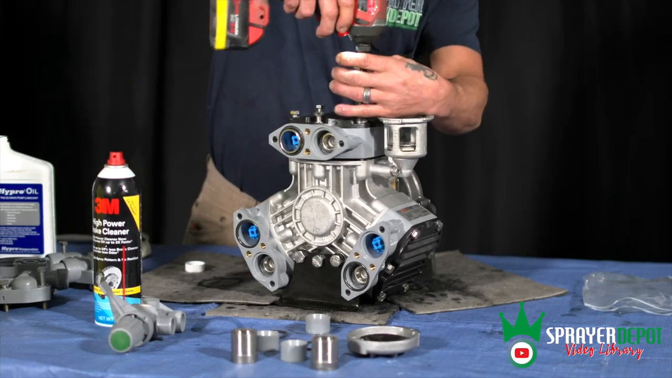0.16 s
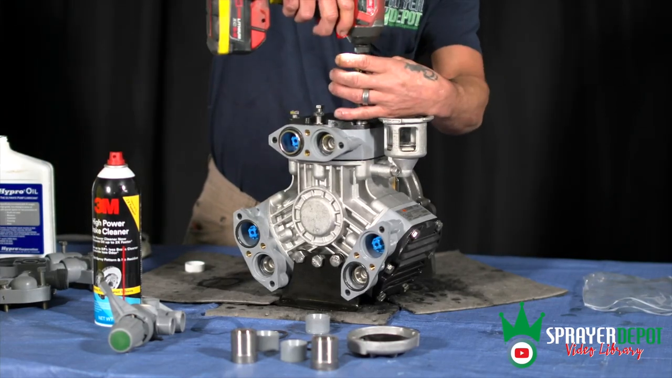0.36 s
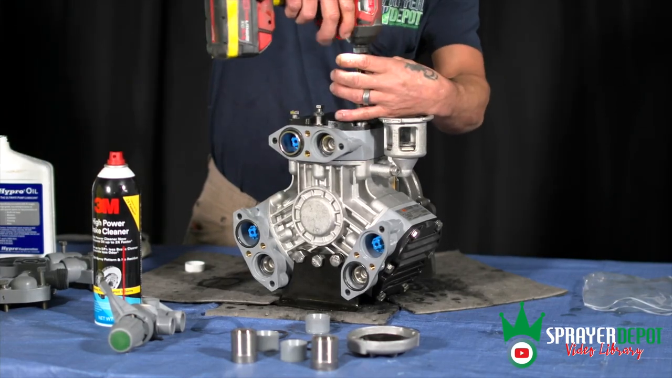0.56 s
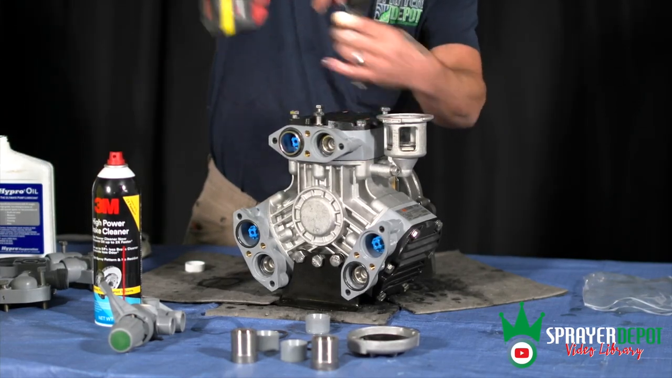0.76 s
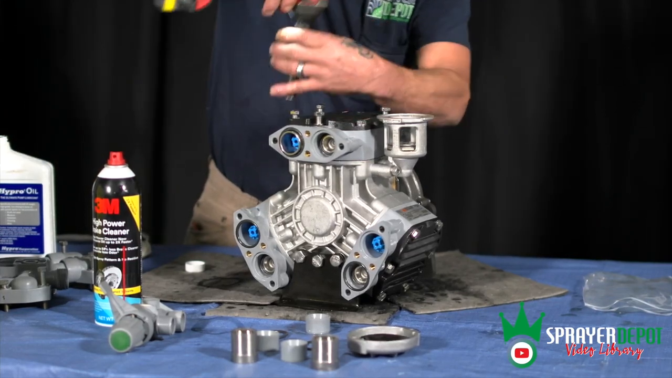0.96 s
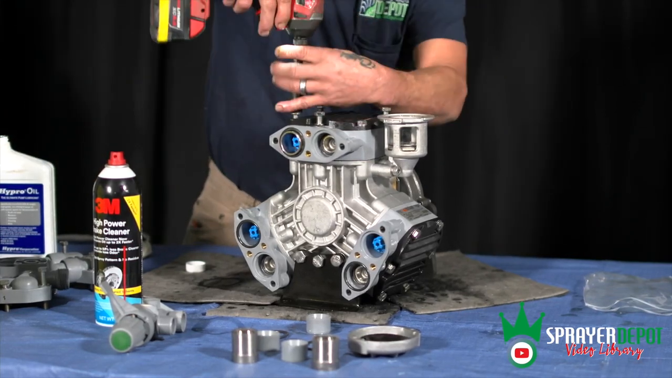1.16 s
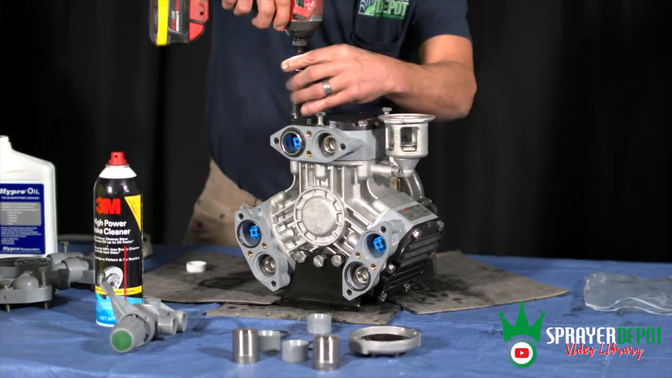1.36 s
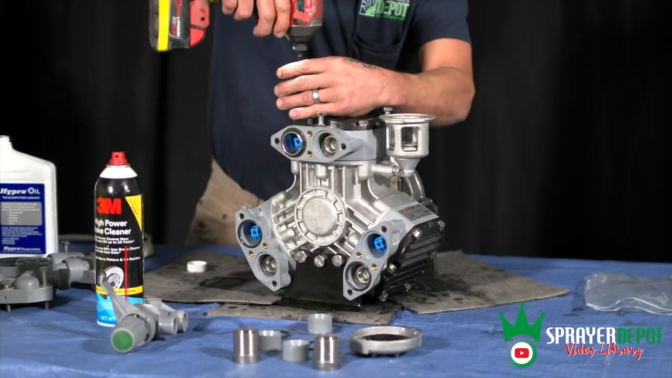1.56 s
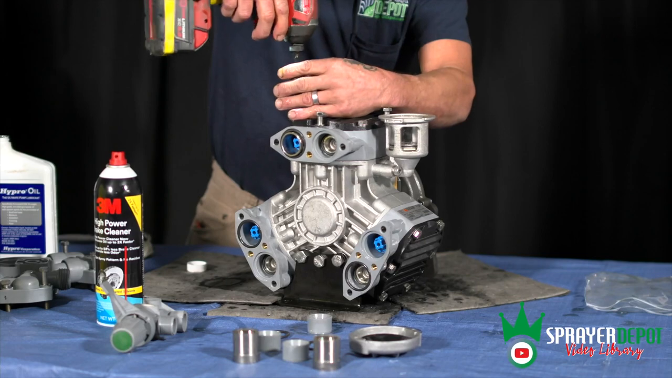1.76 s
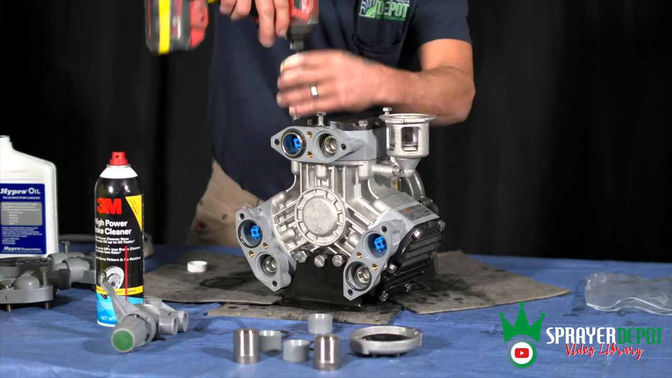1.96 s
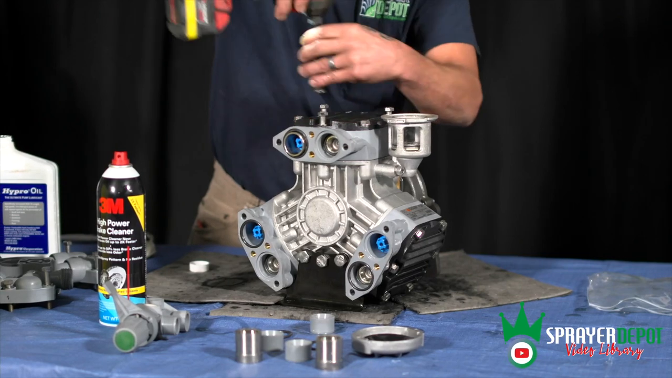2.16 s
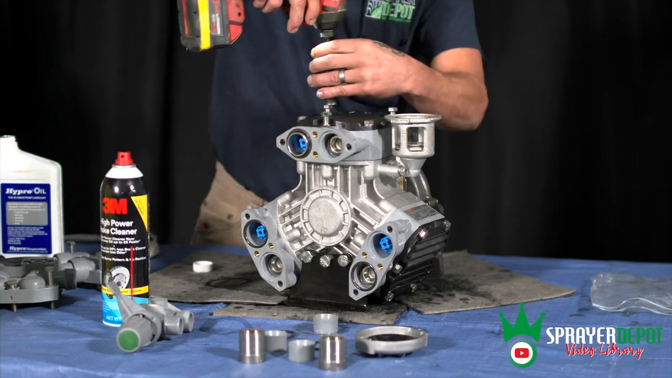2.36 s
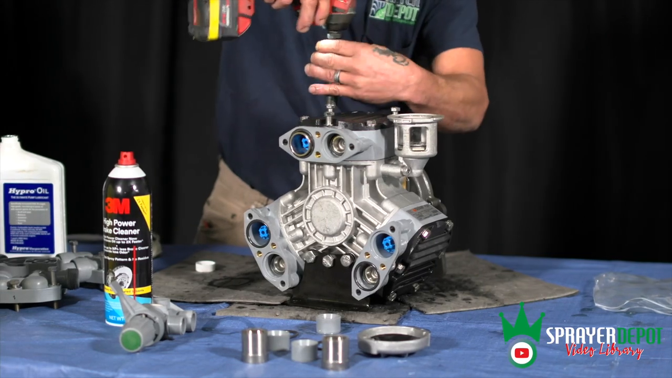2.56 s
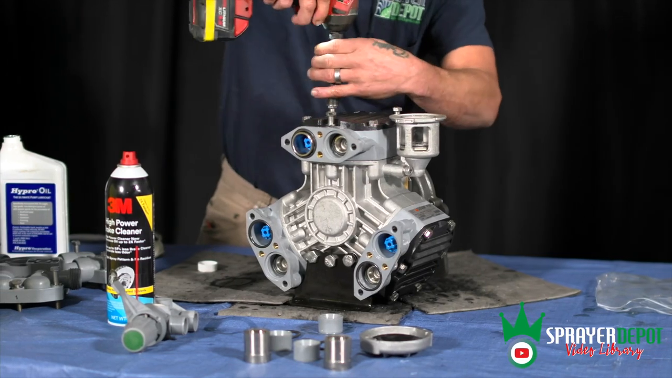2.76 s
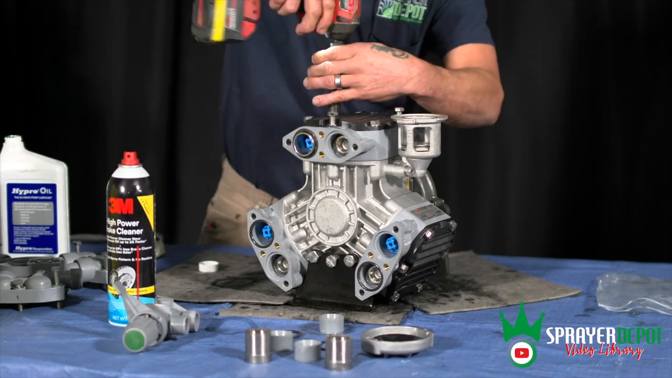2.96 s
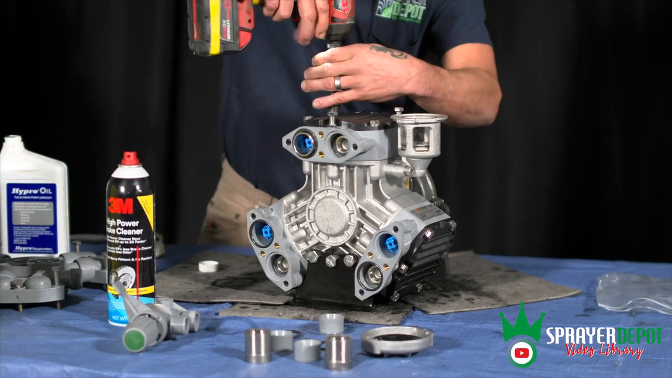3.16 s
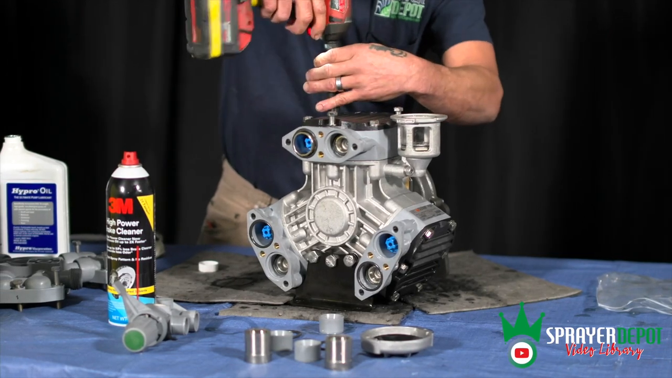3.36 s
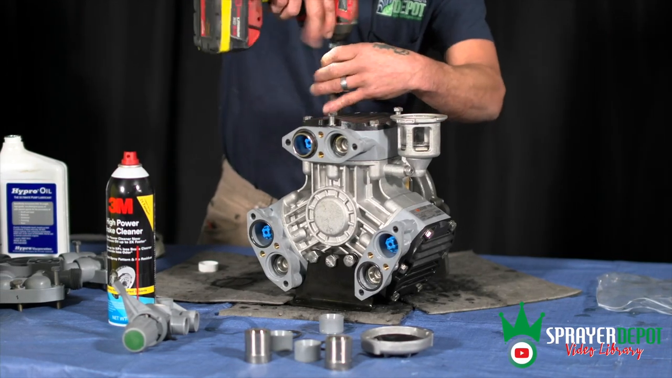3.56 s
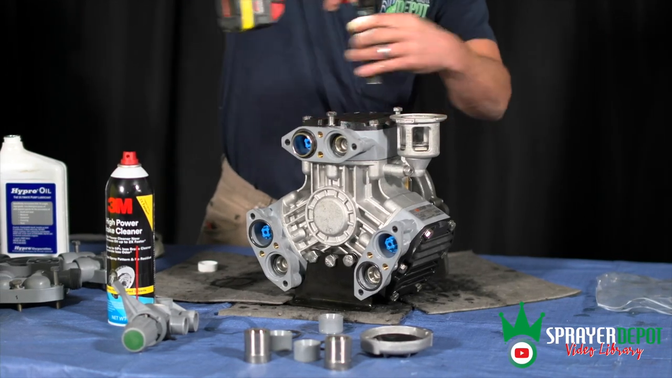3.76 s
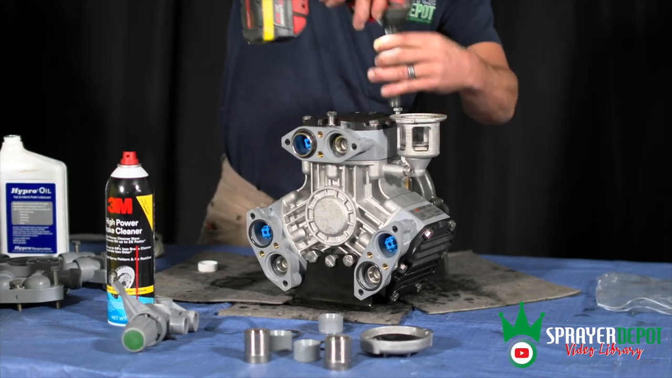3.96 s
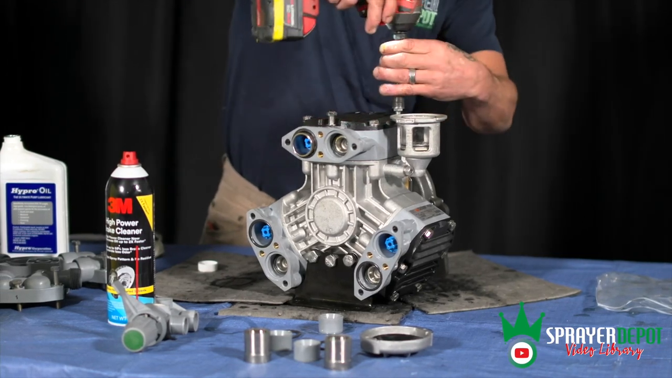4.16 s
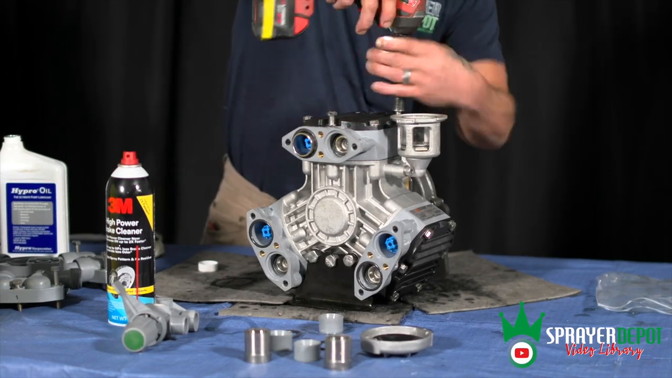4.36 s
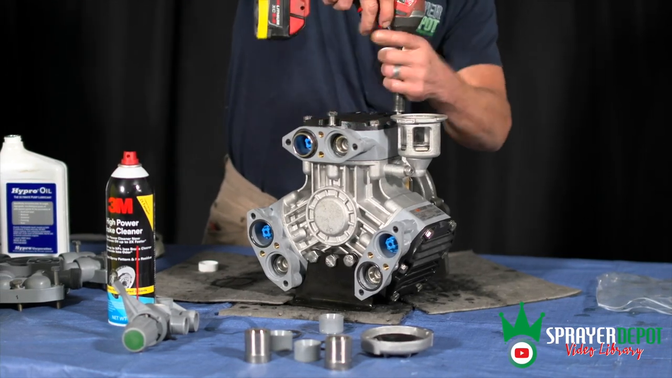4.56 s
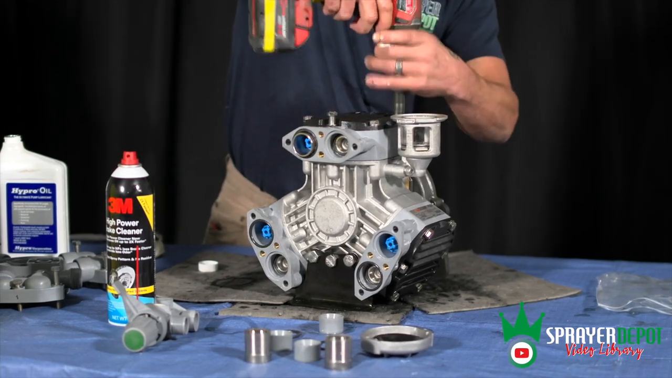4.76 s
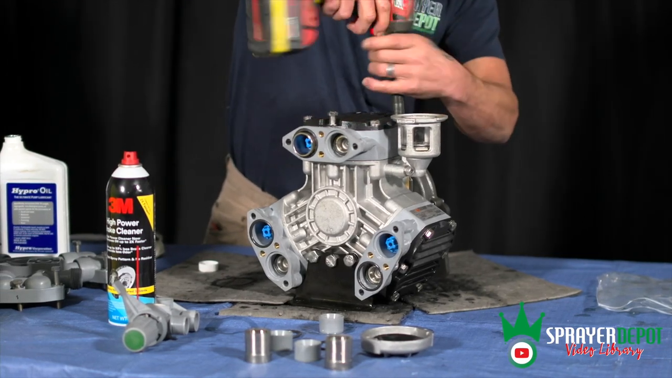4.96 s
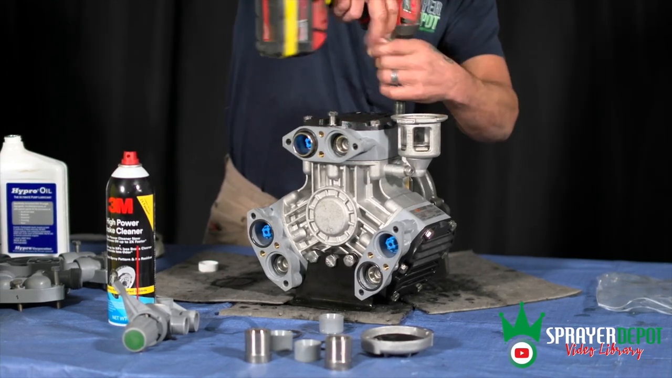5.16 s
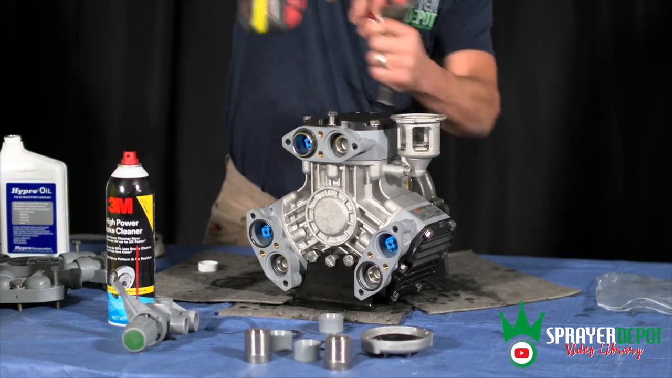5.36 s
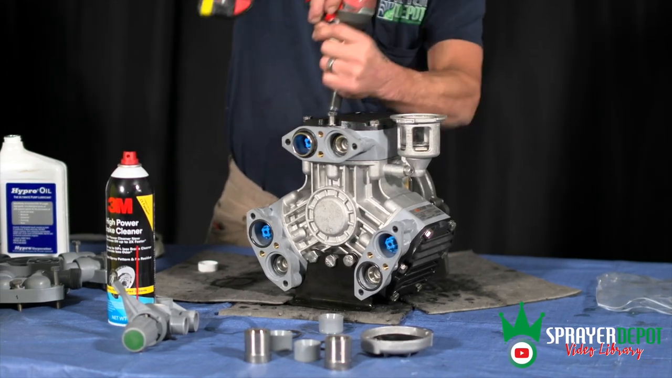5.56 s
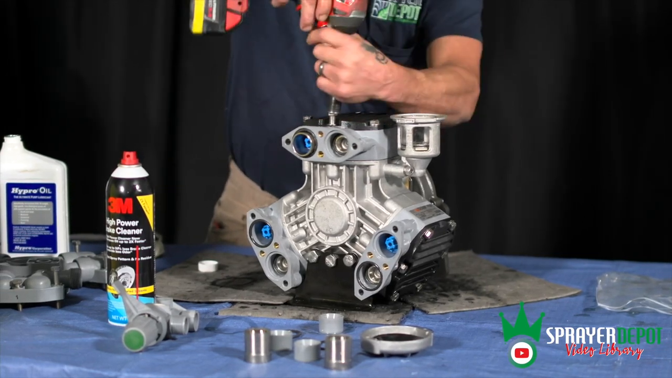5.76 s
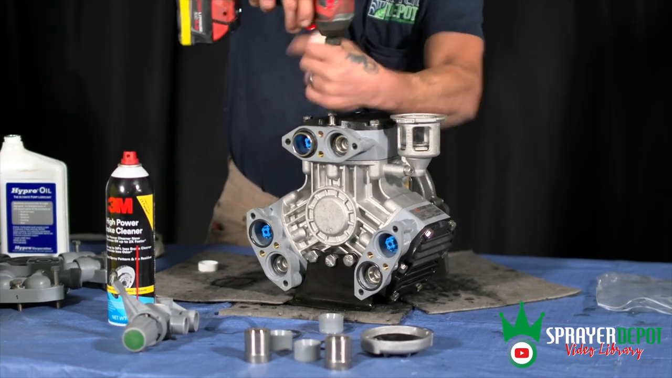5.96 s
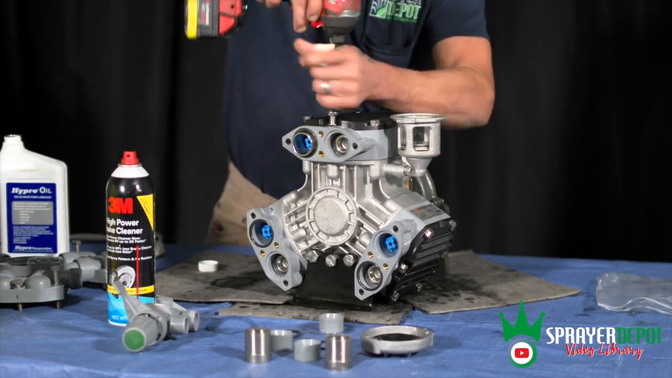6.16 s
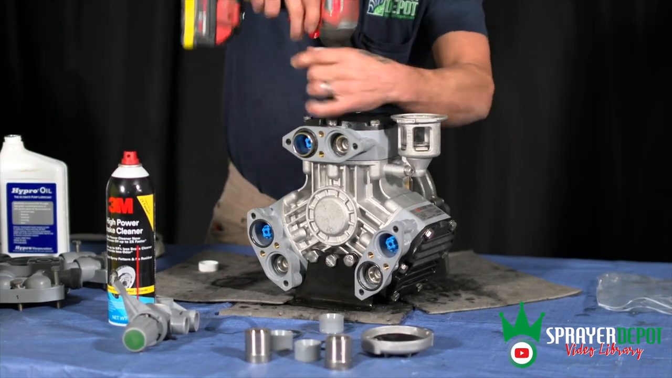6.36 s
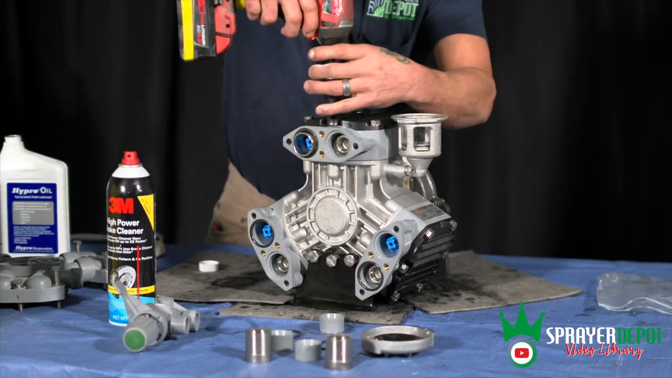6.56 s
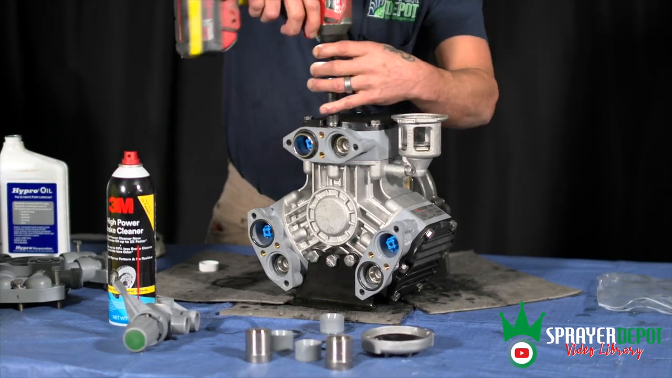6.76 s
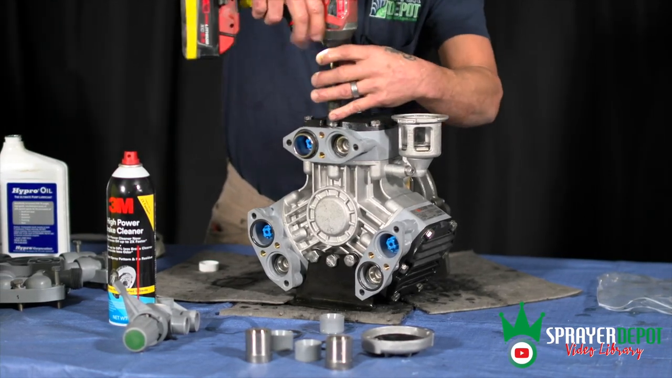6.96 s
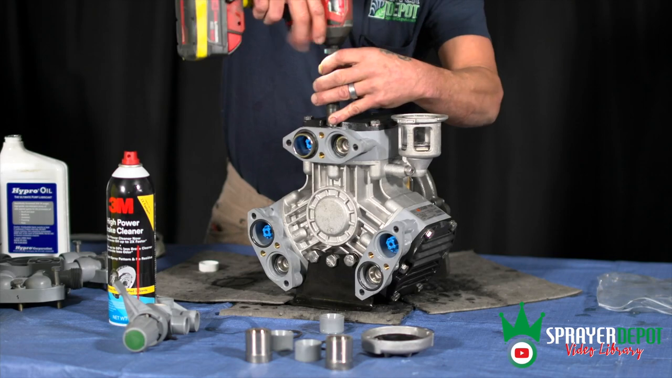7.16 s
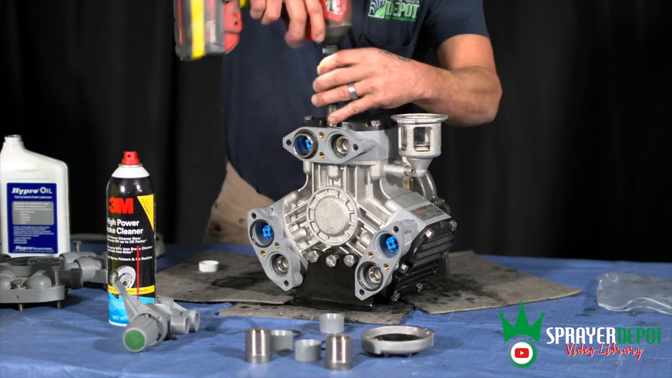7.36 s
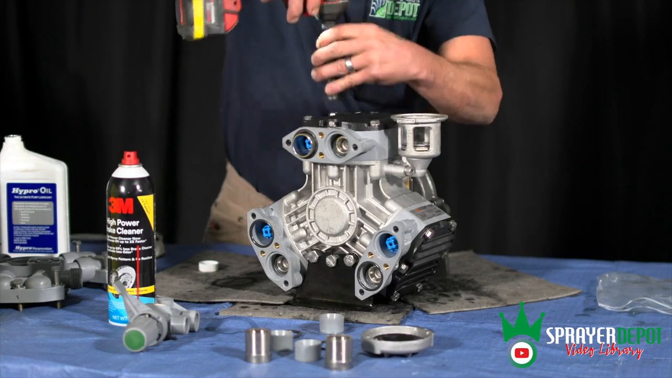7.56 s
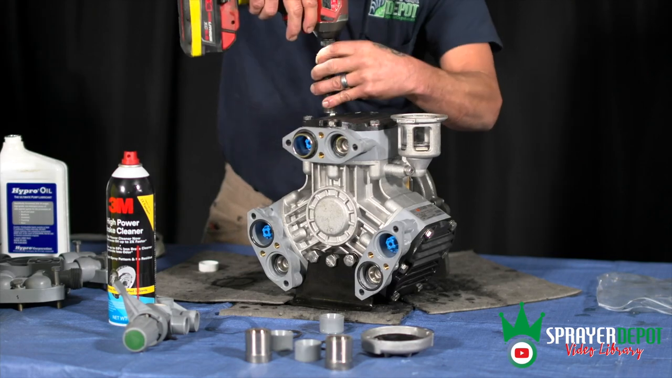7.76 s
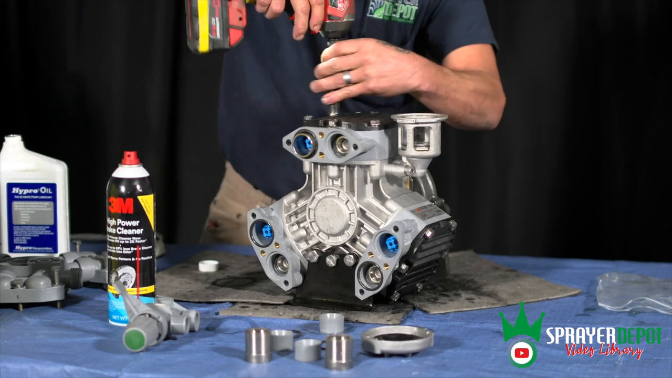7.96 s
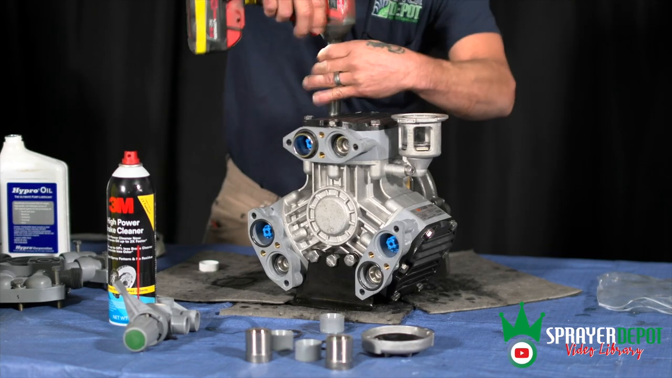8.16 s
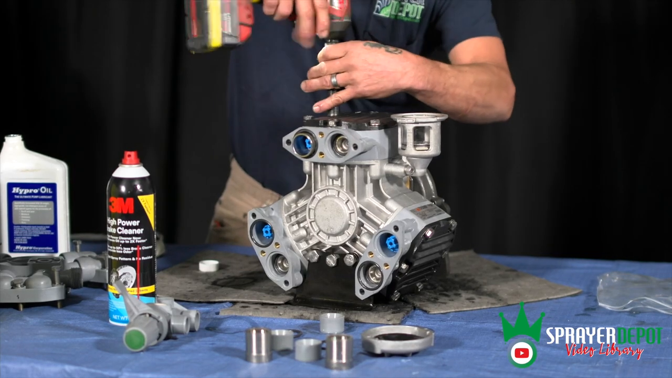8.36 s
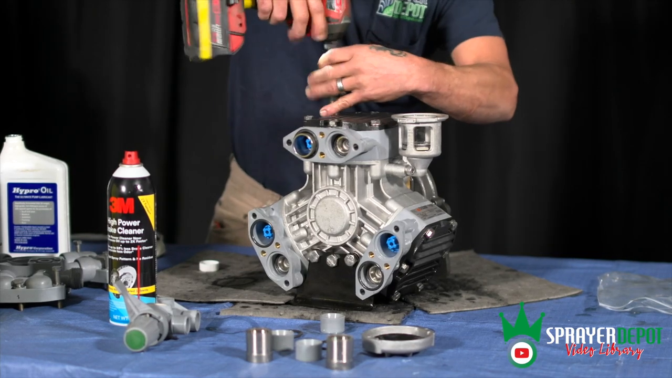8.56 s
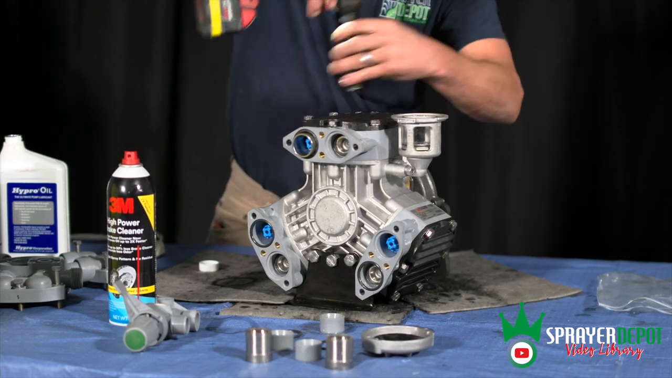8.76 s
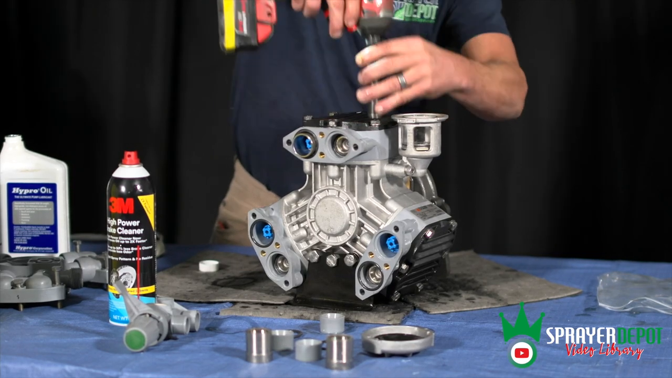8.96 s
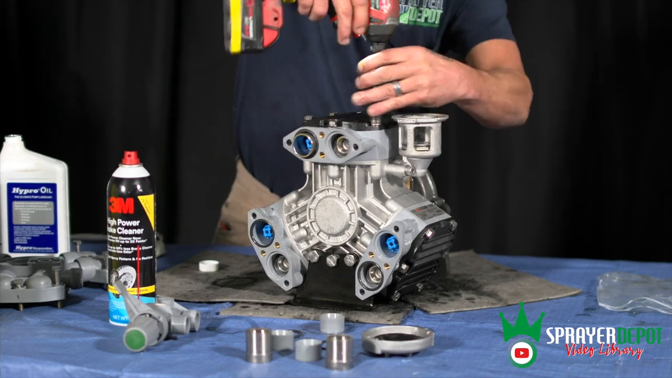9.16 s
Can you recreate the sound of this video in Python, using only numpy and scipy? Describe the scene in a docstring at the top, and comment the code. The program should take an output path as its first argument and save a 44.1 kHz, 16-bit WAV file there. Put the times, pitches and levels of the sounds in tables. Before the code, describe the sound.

A cordless impact driver tightens bolts on a metal pump in a slightly echoing workshop. It starts with brief, fairly quiet whirs of motor and gears and a couple of sharp cracks. Then the pulls end in loud, rapid hammering bursts, which come closer together near the end. Between pulls the steel socket clinks and snaps onto bolt heads. The tool sounds near, over faint ventilation.

```python
"""Impact driver on a pump head.

A cordless driver runs bolts into a casting in a reverberant, ventilated workshop. On each pull the
trigger whistles, motor and gears spin up and the thread rubs. On most pulls the hammer then strikes
the anvil, up to about 70 times a second. Between bolts the socket clinks on the bolt heads."""
import sys
import numpy as np
from scipy import signal
from scipy.fft import rfft, irfft, next_fast_len
from scipy.io import wavfile

SR = 44100
rng = np.random.default_rng(int(sys.argv[2]) if len(sys.argv) > 2 else 0)


def dump_mix(stems):
    """Bounce the given channels to the path in sys.argv[1] as a 16-bit WAV at rate SR."""
    frames = np.atleast_2d(stems).T  # one column per channel
    limited = np.clip(frames, -1, 1)  # hard clip at full scale
    pcm = np.round(limited * 32767).astype(np.int16)
    wavfile.write(sys.argv[1], SR, pcm)


N = 407043
TIME_S = np.arange(N) / SR

# ventilation air noise: f/Hz, level/dB
AIR_SPECTRUM = [(15, -69.5), (25, -40), (87, -16.5), (108, -10), (123, -22.5), (206, -12.5), (242, -10),
                (373, -14.5), (624, -12), (988, -18.5), (1190, -23), (1440, -18.5), (2160, -26),
                (2350, -24), (7000, -40), (16000, -48.5)]
# fan tones: f/Hz, level/dB
FAN_TONES = [(60, -76.5), (94.8, -69), (243, -66.5), (292, -71), (551, -71.5)]
# workshop decay: f/Hz, t60/s
ROOM_DECAY = [(150, 0.38), (700, 0.77), (2000, 0.59), (4000, 0.56), (8000, 0.47), (14000, 0.49)]

# steel socket and bolt: f/Hz, level/dB, t60/s
STEEL_MODES = [(1518, -4, .28), (3450, -12, .35), (3747, -8, .37), (3844, -5, .14), (4750, -15, .45),
               (5048, -14, .52), (6422, -20, .32), (7154, -14, .45), (8960, -17, .42), (9120, -21, .3)]
# tick of a knock: f/Hz, level/dB
KNOCK_SPECTRUM = [(80, -28), (230, 3), (420, -9), (750, 3), (1500, 3), (2300, 5), (3700, 6), (5500, -4),
                  (8300, -4.5), (10500, -21.5), (16000, -30.5)]
# loose socket on bolt heads: t/s, level/dB, thud/dB, edge/dB, ringing/dB, favoured f/Hz
BOLT_KNOCKS = [ (.438, -32, -4.5, 14, -17, 1520), (1.1302, -21.5, 0, -2, -3.5, 4900),
               (2.2949, -15.5, 11.5, 6, -23, 3420), (4.029, -22.5, 8.5, 9, -12.5, 7150),
               (4.354, -26.5, 9.5, 0, -18, 1520), (4.369, -31.5, 19, 0, -18.5, 1520),
               (4.45, -36.5, -1, 1, -13.5, 8980), (5.638, -36, -13, 0, -15, 3800),
               (5.657, -32.5, 8.5, 0, -13, 3800), (5.937, -31.5, 9, 7, -15.5, 1520),
               (6.223, -34.5, 8, -5, -23, 1520), (6.41, -15, 7.5, 2, -29, 1520),
               (6.414, -14.5, 10, -16, -30, 1540), (7.799, -20.5, 3, -7, -6, 4100),
               (7.935, -25, 3, -4.5, -9, 4900), (8.216, -12, 4, 0, -12, 3800),
               (9.045, -23.5, 9, 10.5, -9.5, 9100), (9.224, -18.5, -9, 8.5, -9, 9200)]
# tool clicks at start: t/s, level/dB
TOOL_CLICKS = [(1.681, -21), (2.8406, -24.5), (4.706, -21), (6.499, -18.5), (7.093, -25), (8.28, -27)]
# contacts inside the tool: thud/dB, edge/dB, ringing/dB, favoured f/Hz
CLICK_CONTACT = (-10, 7, -21, 9001)
TAKE_UP_CONTACT = (-2.5, -1, -29, 3803.5)
RATTLE_CONTACT = (0, 7, -27, 7147)
# socket drops home: t/s, level/dB
SEATINGS = [(2.296, -20.5), (7.799, -20), (8.219, -9.5)]
# its snap: f/Hz, width/Hz, level/dB
SEATING_MODES = [(2950, 970, -22), (3560, 720, 31), (4500, 290, -31)]

# trigger pulls: t/s, held/s, top mesh f/Hz, gears/dB, thread/dB, take-up knock/dB
PULLS = [ (-.012, .098, 5900, -22, -27.5, -22.5), (.278, .145, 5501, -29, -27, -37),
         (1.367, .112, 6000, -23.5, -36, -21), (1.68, .085, 6200, -24, -22, -23.5),
         (2.83, .103, 6200, -24.5, -28.5, -17.5), (3.09, .06, 6204, -32, -26.5, -29),
         (3.314, .183, 6256, -25, -19, -32), (4.6969, .335, 6257, -24, -33.5, -16.5),
         (6.497, .35, 6184, -23.5, -37, -10.5), (7.083, 0.12, 6000, -21, -42, -22),
         (7.32, .08, 6010, -24.5, -39, -6), (8.273, .11, 6054, -21, -49, -10.5),
         (8.534, 0.074, 5880, -19, -30, -11)]
# resonances of the rubbing thread: f/Hz, width/Hz, level/dB
RUB_MODES = [(720, 350, -11), (1430, 250, 0), (1720, 280, -7), (3550, 600, -10)]
# gear rattle: f/Hz, level/dB
GEAR_SPECTRUM = [(100, -35), (170, -21.5), (240, -12), (390, -18), (560, -7), (800, -3), (1200, -8),
                 (1500, 1), (2130, -7), (2800, 0.5), (3700, -2.5), (5000, -6), (6500, -9.5), (8200, -9),
                 (10500, -24), (12800, -24.5), (16000, -33.5)]
# gear whine: multiple of mesh rate, level/dB
GEAR_LINES = [(.146, -16), (.222, -15), (.293, -14), (.464, -17), (.585, -4), (1, -4), (2, -22)]
# gear housing: f/Hz, gain/dB
HOUSING_RESPONSE = [(600, -6), (1400, -1), (2200, -5), (2850, 3.5), (3200, 1), (3700, -.5), (4200, -7),
                    (4950, -1.5), (5500, -5.5), (6150, 2), (7000, -5)]

# hammering: t/s, blows, first gap/s, last gap/s, first blow/dB, last blow/dB, slack knock/dB, boom/dB
HAMMER_BURSTS = [ (.505, 2, .0135, .0135, -2, -8, -25.5, -2), (1.7708, 2, .0135, .0135, -4.5, -13, -3, 4),
                 (3.398, 9, .02, .015, -1, 0.5, -17.5, -18),
                 (4.9402, 9, .0158, .017, -2.5, -1.5, -16.5, -9),
                 (6.7418, 8, .017, .025, -2, -2, -22.5, -2), (7.129, 6, .02, .016, 0, -3.5, -8.5, -9),
                 (7.366, 4, .021, .0135, 0, -2.5, -8.5, 5), (8.331, 5, .02, .0175, 1, -4, -5, 2.5),
                 (8.5918, 4, .0135, 0.015, -1, -2.5, -4, 3.5)]
# crack of a blow: f/Hz, level/dB
BLOW_SPECTRUM = [(100, -25), (170, -14), (245, -8.5), (390, -14), (560, -8), (800, -5.5), (1150, -5),
                 (1600, -1.5), (2700, 1), (4900, 0.5), (6300, -7), (8100, -3), (10000, -13.5),
                 (12700, -18.5), (16000, -28)]
# hammer case and pump casting: f/Hz, level/dB, t60/s
BODY_MODES = [(860, -3.5, 0.023), (1510, 8, .04), (1690, -11, .04), (2500, -7, .015), (3680, -1, 0.04),
              (4044, -4.5, 0.033), (4700, 9, .03), (8000, -1.5, .01)]

FULL_MESH_HZ = 6200
SLACK_LEAD_S = .0046


def from_db(db):
    """Decibels to gain."""
    return 10 ** (np.asarray(db) / 20)


def unit_rms(x):
    """Scale to rms 1."""
    return x / np.sqrt(np.mean(x ** 2) + 1e-20)


def at_hz(points, hz):
    """Read a table on a log-frequency axis."""
    known_hz, values = np.transpose(points)
    return np.interp(np.log(hz + 1), np.log(known_hz), values)


def coloured(x, spectrum):
    """Filter x by a spectrum; rms 1."""
    size = next_fast_len(len(x))
    hz = np.fft.rfftfreq(size, 1 / SR)
    return unit_rms(irfft(rfft(x, size) * from_db(at_hz(spectrum, hz)), size)[:len(x)])


def drift(rate_hz):
    """Straight lines between unit Gaussian knots."""
    knots = rng.standard_normal(8192)
    return np.interp(TIME_S * rate_hz, np.arange(len(knots)), knots)


def ring(x, hz, t60_s):
    """One mode: a unit click starts a decaying unit sine."""
    r, w = from_db(-60 / (t60_s * SR)), 2 * np.pi * hz / SR
    return signal.lfilter([0, np.sin(w)], [1, -2 * r * np.cos(w), r * r], x + 1e-18)


def resonance(x, hz, width_hz):
    """Band-pass, peak gain 1."""
    r, w = np.exp(-np.pi * width_hz / SR), 2 * np.pi * hz / SR
    return signal.lfilter(np.array([1, 0, -1]) * (1 - r * r) / 2, [1, -2 * r * np.cos(w), r * r], x)


def smeared_click(envelope):
    """Flat-spectrum click spread over an envelope."""
    noise = rng.standard_normal(len(envelope)) * envelope
    phase = np.angle(rfft(noise, 2 * len(noise)))
    return irfft(np.exp(1j * phase))[:len(noise)] * np.sqrt(np.sum(envelope ** 2))


def add(out, start_s, sound):
    """Mix in a sound; negative times start at 0."""
    start = max(round(start_s * SR), 0)
    part = sound[:max(N - start, 0)]
    out[start:start + len(part)] += part


def ventilation(air_db=-55.5):
    """Soft air noise and steady fan tones."""
    tones = sum(np.sqrt(2) * from_db(db) * np.sin(2 * np.pi * hz * TIME_S) for hz, db in FAN_TONES)
    return from_db(air_db) * coloured(rng.standard_normal(N), AIR_SPECTRUM) + tones


def room_tail(build_s=.0011, treble_db=-3.5):
    """1 s of diffuse echoes, longest in the mids; energy 1."""
    t = np.arange(SR) / SR
    white, hz = rfft(rng.standard_normal(SR)), np.fft.rfftfreq(SR, 1 / SR)
    edges_hz = np.geomspace(80, 20000, 13)
    tail = np.zeros(SR)
    for low, high in zip(edges_hz, edges_hz[1:]):
        centre_hz = np.sqrt(low * high)
        band = irfft(white * ((hz >= low) & (hz < high)), SR)
        tilt_db = at_hz([(3000, 0), (12000, treble_db)], centre_hz)
        tail += band * from_db(tilt_db - 60 * t / at_hz(ROOM_DECAY, centre_hz))
    tail *= 1 - np.exp(-t / build_s)
    return tail / np.sqrt(np.sum(tail ** 2))


def workshop(x, bench_s=.0033, bench_db=-7):
    """Direct sound, bench bounce, and echoes that change as tool and arm move."""
    out, tails = x.copy(), [room_tail() for _ in range(13)]
    add(out, bench_s, from_db(bench_db) * x)
    hop = SR // 25
    fade = np.sin(np.pi * np.arange(2 * hop) / (2 * hop))
    for k, start in enumerate(range(0, N, hop)):
        part = x[start:start + 2 * hop]
        add(out, start / SR, signal.fftconvolve(part * fade[:len(part)], tails[k % len(tails)]))
    return out


def knocks(take_up_s=.032, rattle_delays_s=(.043, .054), rattle_db=11):
    """Rows of light contacts: bolt knocks, start clicks, gear take-up, socket rattle on braking."""
    rows = BOLT_KNOCKS + [(s, db, *CLICK_CONTACT) for s, db in TOOL_CLICKS]
    for s, held_s, _, gear_db, _, take_up_db in PULLS:
        rows.append((s + take_up_s, take_up_db, *TAKE_UP_CONTACT))
        rows += [(s + held_s + lag_s, gear_db + rattle_db, *RATTLE_CONTACT) for lag_s in rattle_delays_s]
    return rows


def socket_clinks(tick_db=-9, tick_s=.0033, ring_db=-23, favour_db=7.5, favour_width_hz=350):
    """Each knock ticks; a hard edge rings the high modes, and the spot struck favours one pitch."""
    out, t = np.zeros(N), np.arange(SR // 2) / SR
    force = np.exp(-t / tick_s)
    for s, db, thud_db, edge_db, ringing_db, favoured_hz in knocks():
        contact = [(1000, thud_db), (2800, 0), (4500, 0), (7000, edge_db)]
        spectrum = [(hz, level_db + at_hz(contact, hz)) for hz, level_db in KNOCK_SPECTRUM]
        tick = coloured(smeared_click(force), spectrum) * np.std(force) * (t < 20 * tick_s)
        tone = 0
        for hz, mode_db, t60_s in STEEL_MODES:
            spot_db = favour_db * np.exp(-((hz - favoured_hz) / favour_width_hz) ** 2)
            envelope = from_db(mode_db + at_hz(contact, hz) + spot_db - 60 * t / t60_s)
            tone += envelope * np.sin(2 * np.pi * hz * t)
        add(out, s, from_db(db) * (from_db(tick_db) * tick + from_db(ring_db + ringing_db) * tone))
    return out


def socket_snaps(slide_s=.0023):
    """The socket slides home with a bright, damped snap."""
    out, t = np.zeros(N), np.arange(SR // 20) / SR
    for s, db in SEATINGS:
        contact = smeared_click(np.exp(-t / slide_s))
        snap = sum(from_db(mode_db) * resonance(resonance(contact, hz, width_hz), hz, 5 * width_hz)
                   for hz, width_hz, mode_db in SEATING_MODES)
        add(out, s, from_db(db) * snap / np.max(np.abs(snap)))
    return out


def trigger_whistle(start_hz=8030, target_hz=9200, squeeze_s=.11, length_s=.09, edge_s=.0056, db=-47.5):
    """The speed control's switching tone climbs as the trigger is squeezed."""
    out, t = np.zeros(N), np.arange(int(length_s * SR)) / SR
    hz = start_hz + (target_hz - start_hz) * np.sin(np.pi / 2 * t / squeeze_s) ** 2
    gate = np.clip(np.minimum(t, length_s - t) / edge_s, 0, 1)
    whistle = from_db(db) * gate * np.sin(2 * np.pi * np.cumsum(hz) / SR)
    for s, *_ in PULLS:
        add(out, s, whistle)
    return out


def motor(spin_up_s=.066, bite_s=.035, brake_hz_per_s=48000, sag=.35, shake_hz=4950, shake_db=1.5):
    """Mesh rate, gear gain, thread gain. Gains grow with speed; hammering slows it and stops the rub."""
    mesh_hz, gear_gain, thread_gain = np.zeros((3, N))
    t = np.arange(SR * 3 // 4) / SR
    for s, held_s, top_hz, gear_db, thread_db, _ in PULLS:
        age_s = t - min(s, 0)
        driven_hz = top_hz * (1 - np.exp(-(np.minimum(age_s, held_s) / spin_up_s) ** 1.45))  # S-curve
        brake = 1 - np.exp(-np.maximum(age_s - held_s, 0) / bite_s)
        hz = np.maximum(driven_hz - brake_hz_per_s * np.cumsum(brake) / SR, 0)
        add(mesh_hz, s, hz)
        add(gear_gain, s, from_db(gear_db) * (hz / FULL_MESH_HZ) ** .88)
        add(thread_gain, s, from_db(thread_db) * (hz / FULL_MESH_HZ) ** 1.1)
    load = hammer_load()
    mesh_hz *= 1 - sag * load
    housing_shake = from_db(shake_db * np.exp(-((mesh_hz - shake_hz) / 450) ** 2))
    return mesh_hz, gear_gain * housing_shake, thread_gain * (1 - load)


def thread_rub(gain, grain_db=4, level_db=-1.5):
    """Small slips of the turning bolt excite a few resonances."""
    slips = rng.standard_normal(N) * from_db(-grain_db * drift(300))
    rub = sum(from_db(db) * resonance(resonance(slips, hz, width_hz), hz, 2 * width_hz)
              for hz, width_hz, db in RUB_MODES)
    return gain * from_db(level_db) * unit_rms(rub)


def gear_rattle(mesh_hz, gain, level_db=-1, lash_db=5.5, lash_hz=700, throb=.55, teeth=14):
    """Teeth rattle unevenly, throbbing once a motor turn."""
    turn_phase = 2 * np.pi * np.cumsum(mesh_hz / teeth) / SR
    contact = unit_rms(from_db(lash_db * drift(lash_hz)) * (1 + throb * np.cos(turn_phase)))
    return gain * from_db(level_db) * contact * coloured(rng.standard_normal(N), GEAR_SPECTRUM)


def gear_whine(mesh_hz, gain, level_db=-6.5, peak_hz=2800, jitter=.003, flutter_db=3):
    """Fluttering lines glide with speed, stand out near half speed and swell at housing resonances."""
    phase = 2 * np.pi * np.cumsum(mesh_hz * (1 + jitter * drift(300))) / SR
    lines = 0
    for order, db in GEAR_LINES:
        housing_db = at_hz(HOUSING_RESPONSE, order * mesh_hz)
        lines += from_db(db + housing_db + flutter_db * drift(130)) * np.sin(order * phase)
    lift = np.minimum(mesh_hz / peak_hz, 1) * np.sqrt(FULL_MESH_HZ / np.maximum(mesh_hz, peak_hz))
    return from_db(level_db) * gain * lines * lift


def blow_times(start_s, count, first_gap_s, last_gap_s, steady_gap_s=.0135, settle_blows=1.5):
    """Blows quicken towards a steady rate and slow as the trigger is eased."""
    slow = np.exp(-np.arange(count - 1) / settle_blows)
    gaps_s = steady_gap_s + (first_gap_s - steady_gap_s) * slow + (last_gap_s - steady_gap_s) * slow[::-1]
    return start_s + np.append(0, np.cumsum(gaps_s))


def hammer_load(ramp_s=.033):
    """Ramps to 1 while hammering, to 0 while the bolt turns freely."""
    load = np.zeros(N)
    for row in HAMMER_BURSTS:
        first_s, *_, last_s = blow_times(*row[:4])
        corners_s = [first_s, first_s + ramp_s, last_s + ramp_s, last_s + 2 * ramp_s]
        load += np.interp(TIME_S, corners_s, [0, 1, 1, 0])
    return np.minimum(load, 1)


def blows(scatter_db=1):
    """Rows t/s, level/dB: per burst, a knock takes up the slack, then blows follow a level ramp."""
    rows = []
    for s, count, first_gap_s, last_gap_s, first_db, last_db, slack_db, _ in HAMMER_BURSTS:
        times_s = blow_times(s, count, first_gap_s, last_gap_s)
        levels_db = np.linspace(first_db, last_db, count) + scatter_db * rng.standard_normal(count)
        rows += [(s - SLACK_LEAD_S, slack_db), *zip(times_s, levels_db)]
    return rows


def hammer(crack_db=-7, crack_s=.0021, chatter_db=-15, chatter_s=.0071, case_db=-42, boom_hz=790):
    """Each blow cracks and chatters the socket; the case rings and the casting booms."""
    kicks, cracks, t = np.zeros(N), np.zeros(N), np.arange(SR // 20) / SR
    force = from_db(crack_db) * np.exp(-t / crack_s) + from_db(chatter_db) * np.exp(-t / chatter_s)
    for s, db in blows():
        add(kicks, s, from_db([db]))
        add(cracks, s, from_db(db) * smeared_click(force))
    cracks = np.std(cracks) * coloured(cracks, BLOW_SPECTRUM)
    case = sum(from_db(db + case_db) * ring(kicks * rng.standard_normal(N), hz, t60_s)
               for hz, db, t60_s in BODY_MODES)
    starts_s, *_, boom_db = np.transpose(HAMMER_BURSTS)
    burst_index = np.maximum(np.searchsorted(starts_s - SLACK_LEAD_S, TIME_S) - 1, 0)
    boom = from_db(boom_db)[burst_index] * resonance(cracks, boom_hz, width_hz=260)
    return cracks + case + boom


def scene(drive_db=-5, low_cut_hz=150, blow_spread=.84, beam_spread=.4):
    """The tool radiates no deep bass; whine and snaps beam forward, the rest fills the room."""
    mesh_hz, gear_gain, thread_gain = motor()
    drive = gear_rattle(mesh_hz, gear_gain) + thread_rub(thread_gain) + trigger_whistle()
    small_body = signal.butter(2, low_cut_hz, "high", fs=SR, output="sos")
    diffuse = signal.sosfilt(small_body, from_db(drive_db) * drive + socket_clinks())
    hammering = signal.sosfilt(small_body, hammer())
    beamed = gear_whine(mesh_hz, gear_gain) + socket_snaps()
    direct = (1 - blow_spread) * hammering + (1 - beam_spread) * beamed
    room = workshop(diffuse + blow_spread * hammering + beam_spread * beamed)
    return (direct + room + ventilation())[None]


def record(dry):
    """The hardest blows clip; low-pass at 15.8 kHz."""
    low_pass = signal.ellip(10, .1, 70, 15800, fs=SR, output="sos")
    return signal.sosfilt(low_pass, np.clip(dry, -.95, .95))


dry = scene()
out = record(dry)
dump_mix(out)
```